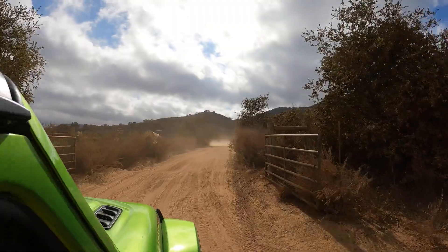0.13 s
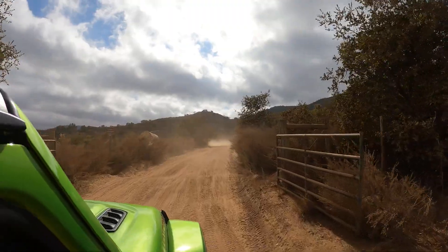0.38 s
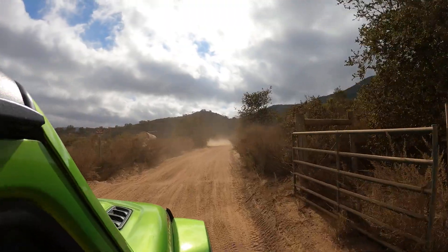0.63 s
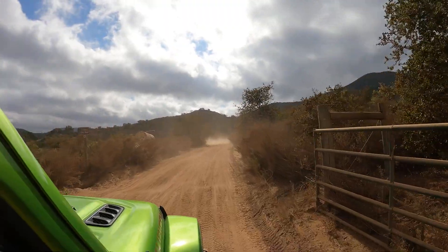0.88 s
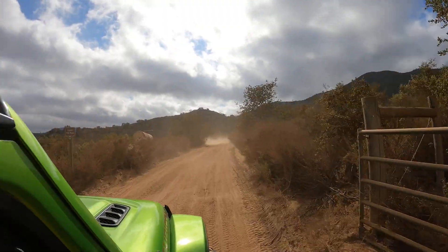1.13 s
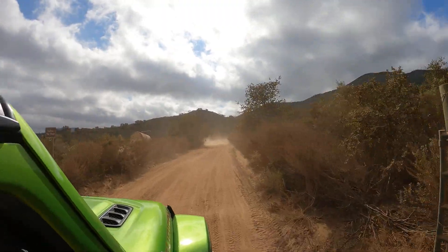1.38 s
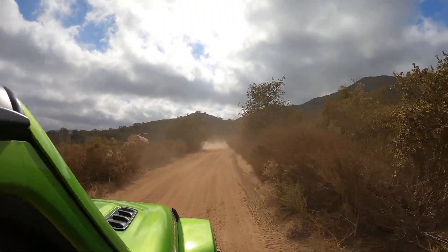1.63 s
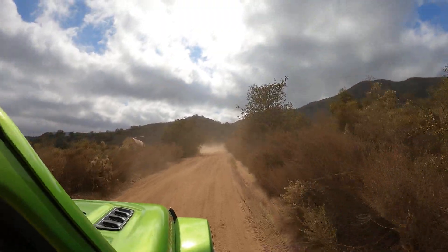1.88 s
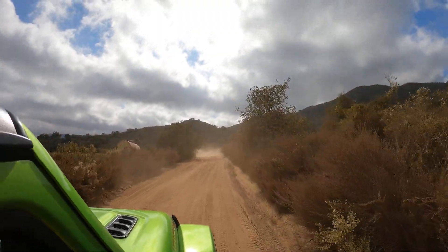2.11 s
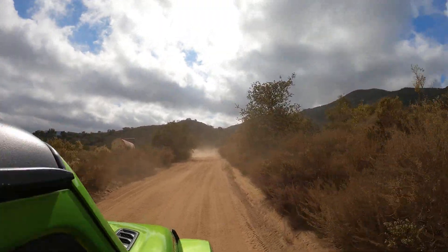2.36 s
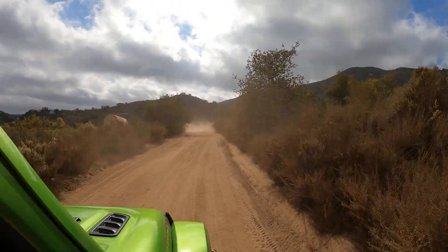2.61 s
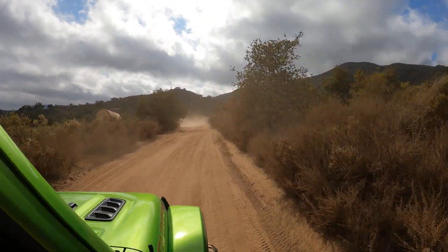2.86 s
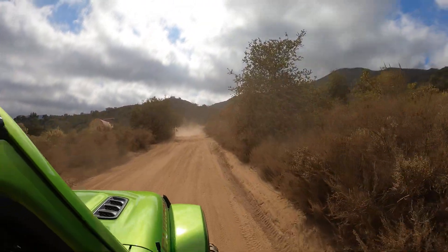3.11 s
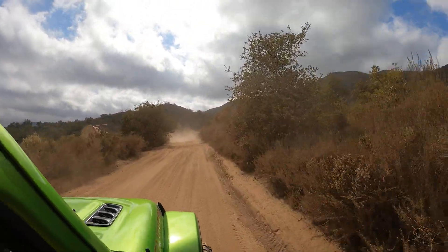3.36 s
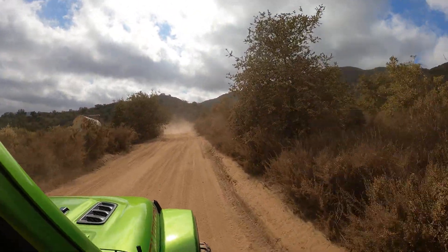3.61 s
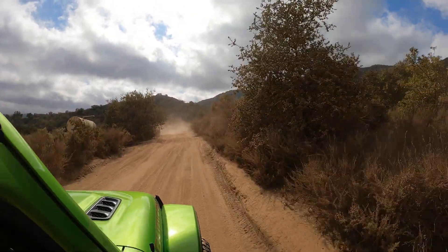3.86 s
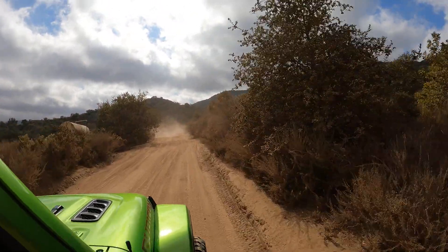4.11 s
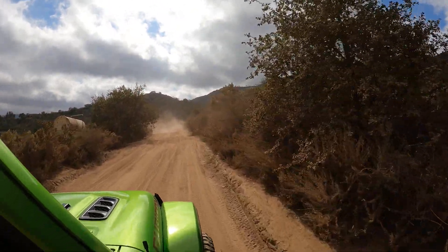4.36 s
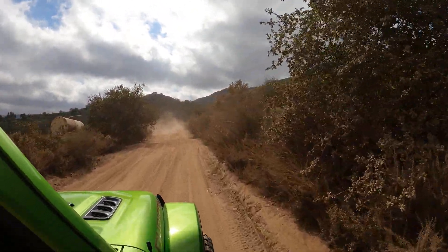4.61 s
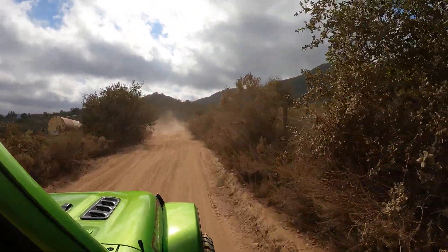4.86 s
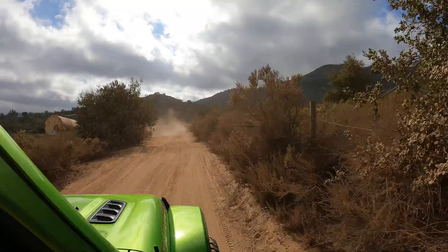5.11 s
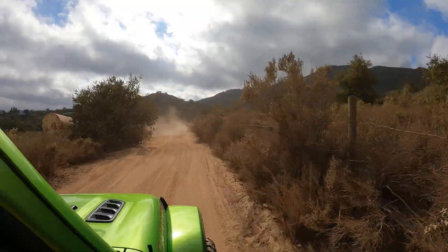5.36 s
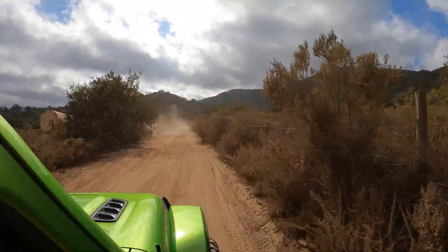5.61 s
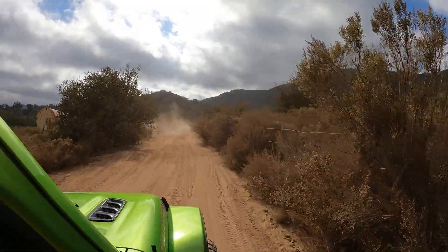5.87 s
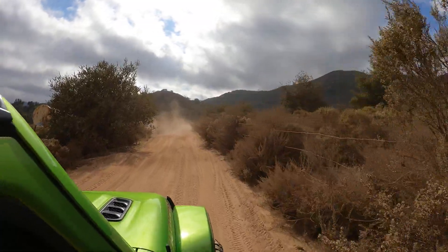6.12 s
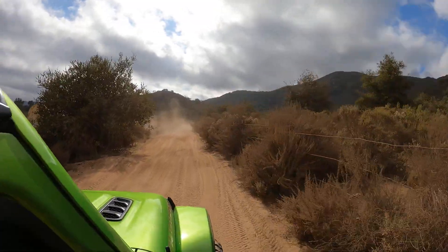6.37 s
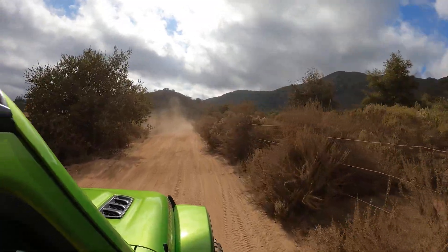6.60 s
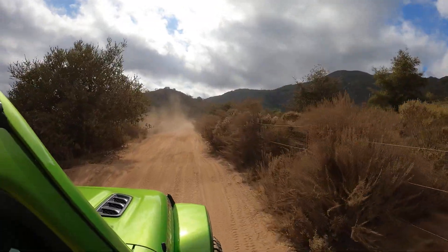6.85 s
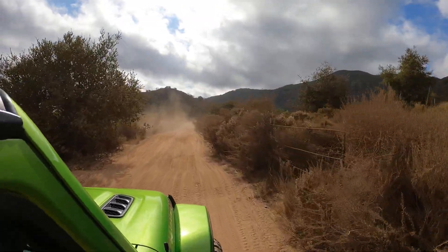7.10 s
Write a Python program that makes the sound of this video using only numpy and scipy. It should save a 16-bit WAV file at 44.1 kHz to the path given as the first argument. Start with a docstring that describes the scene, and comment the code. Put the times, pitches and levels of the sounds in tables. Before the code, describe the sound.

Heavy, ragged wind noise thumps and crackles over an off-road vehicle rolling along sandy ground, its low engine drone and tyre roar mostly buried.

```python
"""Wind buffets the microphone port first of all: a deep rumble, a throb, a flutter and short sharp gusts.
Place: the door of an off-road car rolling along a sandy track; one microphone, with the wind right on its port.
Tyre hiss and a low drone come back off the bushes and swell where they stand close; the exhaust hums and
gears whine faintly. Wind, tyres and drone are shaped noise, snaps are pulses, exhaust and gears are sines.
A fast, soft limiter holds the peaks down."""
import sys
import numpy as np
from scipy import signal
from scipy.fft import rfft, irfft, next_fast_len
from scipy.io import wavfile
from scipy.ndimage import uniform_filter1d, minimum_filter1d, map_coordinates

SR = 44100
rng = np.random.default_rng(int(sys.argv[2]) if len(sys.argv) > 2 else 0)


def to_linear_factor(level_db):
    """Convert decibel levels (scalar or array-like) to linear amplitude factors."""
    exponent = np.asarray(level_db, float) / 20
    return 10 ** exponent


def store_pcm(level_fs):
    """Save levels as 16-bit WAV."""
    pcm = np.round(np.clip(level_fs, -1, 1) * 32767).astype(np.int16)
    wavfile.write(sys.argv[1], SR, np.atleast_2d(pcm).T)


N = 318843  # samples

# air streaming over the port: [t/s, common strength/dB, tilt from large to small eddies/dB]
WIND_STREAM = [(0, -21, 2), (.15, -19, 0), (.4, -19, 0), (.75, -19, 0), (1, -20.5, 0), (1.5, -19.5, 0),
               (1.9, -19, 0), (2.3, -20, 0), (2.7, -20, 0), (2.85, -18, 0), (3.2, -21, 0), (3.4, -21.5, 0),
               (3.7, -20, 0), (4.05, -18, 0), (4.12, -24, 0), (4.45, -22, 0), (4.7, -20, 0), (5.1, -19, 0),
               (5.7, -18, 0), (6.15, -21, 0), (6.6, -18, 0), (6.95, -20, 0), (7.1, -19, 0), (7.23, -22, 0)]
# lulls, the stream briefly lifts off the port: [middle t/s, length scale/s, depth/dB]
WIND_LULLS = [(0.32, 0.044, 8.5), (0.567, 0.021, 6), (0.854, 0.037, 6), (1.218, 0.024, 10.5),
              (1.377, 0.056, 6), (1.54, 0.13, 5), (2.024, 0.04, 3.5), (2.252, 0.041, 7), (2.606, 0.016, 9),
              (2.953, 0.098, 10.5), (3.177, 0.098, 5), (3.624, 0.022, 0), (3.976, 0.052, 9),
              (4.19, 0.021, 5.5), (4.575, 0.033, 10.5), (4.83, 0.025, 11), (5.246, 0.021, 12.5),
              (5.396, 0.022, 6), (5.484, 0.018, 5), (5.953, 0.023, 20), (6.024, 0.028, 10.5),
              (6.217, 0.033, 6.5), (6.353, 0.017, 12), (6.705, 0.052, 5), (6.951, 0.021, 10),
              (7.035, 0.033, 5.5), (7.168, 0.041, 10), (2.393, 0.031, 6), (3.03, .025, 3), (3.352, .04, 4),
              (4.028, 0.024, 10.5), (4.102, 0.033, 9.5), (4.636, .025, 9), (4.725, .025, 7),
              (5.042, .025, 6), (5.139, .015, 6), (6.156, 0.023, 6.5), (6.405, .035, 1), (6.605, .03, 1.5),
              (6.823, .05, 5), (6.886, .02, 3)]
# heaves, large eddies rolling over the port: [middle t/s, rise or, if negative, dip/dB]
WIND_HEAVES = [(.12, 3), (.27, 5), (.5, 2.5), (.65, 3.5), (.92, 5), (1.43, 4), (1.52, 11), (1.75, 3.5),
               (1.849, 1), (2.16, 0), (2.28, 5), (2.48, -3), (2.82, -4), (3.01, 7), (3.3, 5.5), (3.54, 6),
               (3.65, 12), (3.92, 9), (4.06, 7), (4.67, 6.5), (4.79, 4), (5.19, 1.5), (5.35, 1), (5.5, 0),
               (5.6, 8), (5.98, 3.5), (6.06, 7), (6.28, 7), (6.63, 4), (6.78, 5), (6.89, 7)]
# gusts, eddies bursting on the port: [t just before the peak/s, reference level/dB, length scale/s]
GUST_BURSTS = [(0.035, -16, 0.027), (0.127, -10.5, 0.02), (0.221, -15, 0.024), (0.394, -18.5, 0.019),
               (0.503, -19, 0.032), (0.622, -14.5, 0.024), (0.681, -9, 0.019), (0.743, -16.5, 0.015),
               (0.777, -9.5, 0.015), (0.931, -18, 0.026), (1.184, -20, 0.021), (1.295, -17.5, 0.017),
               (1.622, -16, 0.0093), (1.829, -14, 0.01), (1.922, -23, 0.028), (1.981, -16, 0.022),
               (2.1, -10, 0.014), (2.129, -15.5, 0.025), (2.265, -15, 0.04), (2.328, -16, 0.017),
               (2.46, -11.5, 0.017), (2.816, -13, 0.025), (3.061, -14, 0.019), (3.097, -12.5, 0.014),
               (3.296, -18, 0.017), (3.485, -11, 0.033), (3.676, -11.5, 0.028), (3.741, -11.5, 0.019),
               (3.771, -10, 0.03), (3.803, -14, 0.015), (3.905, -12, 0.026), (3.989, -16.5, 0.022),
               (4.036, -18, 0.028), (4.5, -8, 0.016), (4.576, -12.5, 0.018), (4.612, -15, 0.017),
               (5.088, -14.5, 0.02), (5.157, -18, 0.018), (5.212, -14.5, 0.017), (5.295, -14, 0.022),
               (5.316, -17.5, 0.031), (5.414, -10.5, 0.028), (5.551, -15, 0.024), (5.592, -11, 0.021),
               (5.643, -14, 0.03), (5.715, -9.5, 0.017), (5.802, -14, 0.029), (5.878, -9.5, 0.021),
               (5.962, -16, 0.036), (6.048, -14.5, 0.018), (6.163, -17.5, 0.017), (6.242, -17, 0.02),
               (6.285, -14, 0.027), (6.373, -14.5, 0.011), (6.476, -14, 0.011), (6.536, -12.5, 0.015),
               (6.727, -7, 0.026), (6.911, -13.5, 0.021), (6.976, -16, 0.018), (7.06, -20.5, 0.022),
               (7.11, -23, 0.022), (0.448, -16, 0.019), (1.321, -22.5, 0.023), (1.785, -19.5, .018),
               (2.655, -20.5, .018), (2.857, -18.5, 0.014), (2.994, -23.5, 0.013), (3.45, -15, 0.016),
               (4.314, -22, 0.021), (4.665, -23, 0.027), (4.741, -21, 0.018), (4.906, -22, .018),
               (4.99, -23, .018), (5.501, -18.5, .018), (6.573, -18.5, 0.012), (6.76, -15, 0.015),
               (7.2, -19.5, 0.024)]
# smallest eddies breaking on the port edge: [t/s, reference level/dB, width scale/ms]
EDGE_SNAPS = [(0.4056, -18, 0.145), (0.5241, -22, 0.32), (0.63, -21, 0.34), (0.6804, -21.5, 0.24),
              (0.6855, -15.5, 0.21), (0.7183, -14.0, 0.32), (0.7222, -14.0, 0.22), (0.7547, -18.0, 0.33),
              (0.7721, -13.0, 0.32), (0.7777, -14.5, 0.19), (2.27, -20.0, 0.19), (2.2808, -17.0, 0.16),
              (2.3026, -20.5, 0.16), (2.5935, -20.5, 0.19), (2.738, -19.0, 0.17), (2.8268, -16, 0.24),
              (2.863, -20.0, 0.16), (3.0611, -17.0, 0.22), (3.0996, -16.0, 0.29), (3.1033, -17.0, 0.24),
              (3.4906, -13.5, 0.29), (3.651, -17.0, 0.2), (3.663, -18.0, 0.2), (3.6831, -14.5, 0.26),
              (3.6869, -12.0, 0.27), (3.7042, -13.0, 0.16), (3.7093, -15.0, 0.23), (3.7476, -13.5, 0.3),
              (3.7681, -10.5, 0.29), (3.811, -14.5, 0.24), (3.9177, -14.0, 0.3), (3.9262, -13.0, 0.27),
              (4.2359, -19.5, 0.21), (4.5019, -18, 0.24), (4.5066, -13.5, 0.27), (4.5103, -17.0, 0.22),
              (4.5145, -15.5, 0.27), (4.5186, -13.0, 0.26), (4.5798, -11, 0.16), (4.5865, -18.0, 0.16),
              (4.5903, -12, 0.15), (4.6221, -16.0, 0.16), (5.1086, -17.5, 0.19), (5.1137, -20.0, 0.19),
              (5.1497, -19.5, 0.16), (5.154, -16.0, 0.27), (5.1585, -14, 0.25), (5.1612, -12, 0.14),
              (5.2931, -12, 0.24), (5.3017, -19.5, 0.16), (5.309, -15.5, 0.22), (5.3186, -17.5, 0.26),
              (5.3223, -13.5, 0.22), (5.3282, -17.0, 0.29), (5.3673, -23, 0.3), (5.4145, -19.0, 0.16),
              (5.4188, -14.0, 0.3), (5.5519, -14, 0.27), (5.5555, -12.0, 0.29), (5.5626, -18.0, 0.16),
              (5.5662, -21.0, 0.17), (5.5719, -12.5, 0.32), (5.5951, -14, 0.19), (5.6098, -17.0, 0.27),
              (5.6416, -16, 0.18), (5.6499, -20.5, 0.24), (5.6663, -20, 0.3), (5.7037, -22.5, 0.16),
              (5.7173, -8.0, 0.29), (5.8042, -19.0, 0.27), (5.8077, -22.5, 0.19), (5.8131, -22.5, 0.27),
              (5.854, -24.5, 0.16), (5.8776, -22.5, 0.24), (5.8824, -12.5, 0.27), (5.8893, -22.0, 0.16),
              (6.0505, -26.0, 0.16), (6.0585, -25.5, 0.16), (6.2865, -25, 0.28), (6.2947, -20.0, 0.32),
              (6.4665, -28.5, 0.18), (6.4819, -21.0, 0.21), (6.5314, -21.0, 0.27), (6.542, -19, 0.17),
              (6.5485, -24.0, 0.16), (6.5526, -29.0, 0.16), (6.5598, -27.0, 0.24), (6.7107, -27.0, 0.24),
              (6.7308, -26.0, 0.27), (6.7386, -14.5, 0.28), (6.7449, -20.5, 0.29), (6.8551, -27, 0.28),
              (6.9093, -21.5, 0.27), (6.9173, -26.5, 0.26), (6.9237, -25.5, 0.18), (6.9285, -16.5, 0.26),
              (6.9843, -17, 0.17), (6.9907, -20.0, 0.19), (6.9951, -27.5, 0.16), (7.096, -20.5, 0.27)]
# the stream tears raggedly at the port edge: [middle t/s, length scale/s, level/dB]
EDGE_FLURRIES = [(0.01, 0.044, -25.5), (0.134, .08, -33.5), (3.678, 0.049, -31.5), (3.77, 0.11, -29.5),
                 (3.914, 0.06, -30), (4.608, 0.09, -40), (5.154, 0.031, -41), (5.32, 0.083, -34.5),
                 (5.57, 0.051, -31), (5.655, 0.048, -35), (5.73, 0.03, -34.5), (6.536, 0.038, -38),
                 (6.987, 0.02, -37)]
# the car as the roadside throws it back: [t/s, nearness of bushes/dB, drone level/dB, tyre grip/dB]
ROADSIDE = [(0.05, -43.5, 7.5, -10), (0.07, -46, -4.5, 0), (0.6, -50, 7, 1.5), (0.72, -47.5, -6, 0),
            (0.84, -49.5, 1, 1), (0.9, -48, 0.5, 0), (1.3, -46, 1.5, 0), (1.5, -45.5, 1, 2),
            (1.7, -44.5, 0, 1), (1.72, -46, 0, 1.5), (2.05, -47.5, 5.5, 3.5), (2.31, -47, 1.5, 1),
            (2.45, -49.5, 2, 3.5), (2.81, -46.5, 3.5, 3), (3.05, -44.5, 0.5, 1.5), (3.2, -45, 7, 3.5),
            (3.35, -45, -6, 4), (3.5, -44.5, 5, 3), (3.68, -43, 5.5, 2), (3.9, -44, 3, -1.5),
            (3.96, -46, 4.5, 3), (4.26, -47.5, 7.5, 3), (4.48, -43, 7, 0), (4.74, -47, 4, 3),
            (5.09, -43.5, 1, 0), (5.89, -51.5, 5, 2.5), (6.05, -48.5, -16, -2), (6.12, -53.5, 3, 3),
            (6.28, -51, -7, -2), (6.64, -52.5, 4, 0.5), (7.18, -53, 0, 1.5)]
# the engine slows, holds, climbs as a lower gear engages, falls away: [t/s, cycle rate f/Hz, load/dB]
ENGINE_RUN = [(0, 51.4, -38), (.16, 51.2, -43), (.28, 51, -47), (.4, 47.5, -54), (.58, 42.8, -56),
              (.7, 37, -58), (1, 33.4, -54), (2.15, 30.9, -48), (2.85, 32.8, -47), (3.2, 33.3, -44),
              (3.45, 33.2, -40), (3.6, 35, -46), (3.75, 43, -43), (3.95, 46.4, -42), (4.1, 47.6, -44.5),
              (4.45, 46.3, -46), (4.65, 45, -50), (5.05, 41, -55), (5.3, 39, -70), (7.23, 36, -80)]
# relative level/dB of the 4th to 19th multiples of the cycle rate
EXHAUST_HARMONICS = [-5, -2, -8, -7, -4, -2, -8, -8, -7, -8, -9, -4, -7, -10, -9, -9]
# response of the exhaust pipe: [f/Hz, gain/dB]
EXHAUST_PIPE = [(100, 0), (570, 0), (660, -5), (800, -12), (1100, -25)]
# faint gear tones: [start t/s, length/s, f at start/Hz, glide/(Hz/s), reference level/dB]
GEAR_WHINES = [(-.1, 0.33, 1445, -26, -50), (0.43, 0.52, 1488, 5.5, -49), (0.804, 0.56, 1466, 19.5, -48),
               (1.304, 0.33, 1480, -61, -48), (3.724, 0.36, 1430, 190, -43.5),
               (3.862, 0.2, 1475, -170, -46), (3.748, 0.28, 1594, -20.5, -48),
               (4.621, 0.32, 1483, -48, -48), (2.444, 0.35, 1380, 1, -50), (3.001, 0.26, 1556, 200, -45),
               (3.418, 0.33, 1580, -60.5, -48)]
# noise colours, from large eddies to tyre hiss: [f/Hz, relative spectral level/dB]
RUMBLE_COLOUR = [(8, -31.5), (20, 0.5), (30, -4), (50, -5), (75, -10.5), (140, -60.5)]
THROB_COLOUR = [(35, -31.5), (55, -0.5), (80, -2), (120, -2), (160, -12), (300, -37.5)]
FLUTTER_COLOUR = [(80, -48), (140, -2.5), (220, -2), (350, -16), (600, -30), (1200, -71)]
GUST_COLOUR = [(60, -19), (130, -3.5), (200, 3), (330, -6), (550, -22), (1200, -51)]
EDGE_COLOUR = [(200, -31.5), (380, -0.5), (650, -12), (1000, -15.5), (1500, -18.5), (2500, -37)]
DRONE_COLOUR = [(200, -36.5), (300, -3.5), (420, -7.5), (510, -3), (620, -7), (800, -23), (1200, -41)]
ROAR_COLOUR = [(400, -43.5), (700, -2), (1000, -2), (1250, -3.5), (1500, -1), (1800, -5.5), (2300, -10),
               (3200, -25), (5000, -59)]
GRAVEL_COLOUR = [(900, -31.5), (1400, -4), (2000, 0), (2800, -7), (4000, -12), (6000, -37.5)]
HISS_COLOUR = [(1300, -35), (2200, -2.5), (2800, -4.5), (3600, -7.5), (4200, -9), (5000, -14),
               (6300, -20.5), (8000, -24.5), (9000, -31.5), (10500, -40), (12000, -47.5), (13500, -66.5),
               (15500, -70.5)]


def wind():
    """One strength drives all eddies: large ones rumble, smaller ones throb and flutter in partly shared lumps."""
    rumble_db, throb_db, flutter_db = -2.5, -4, -17  # each eddy size over the strength
    heave_s = 0.044  # length scale
    t = np.arange(N) / SR
    strength_db, tilt_db = curves(WIND_STREAM)
    strength_db = strength_db - sum(depth * bell(t, s, length) for s, length, depth in WIND_LULLS)
    heave_db = sum(rise * bell(t, s, heave_s) for s, rise in WIND_HEAVES)
    lumps = wobble(14)

    rumble_lumps = to_linear_factor(1.4 * wobble(9.1) + 0.7 * lumps)
    rumble = unit(rumble_lumps * even(rush(RUMBLE_COLOUR), 0.034))
    rumble = rumble * to_linear_factor(strength_db + rumble_db + heave_db - tilt_db / 2)

    # each gust also shoves the throb
    gust_s, gust_db, _ = np.transpose(GUST_BURSTS)
    shove = bells(gust_s, gust_db - 5.5, 0.026, peak_at=0.48)
    throb_lumps_db = 1.22 * lumps + 1.7 * wobble(7) + 1.5 * wobble(26)
    steady = to_linear_factor(strength_db + throb_db + tilt_db / 2 + throb_lumps_db)
    throb = np.hypot(steady, shove) * even(rush(THROB_COLOUR, patchy_db=3), 0.053)

    # the small eddies swing wider than the strength
    flutter_lumps = to_linear_factor(1.3 * lumps + 1.9 * wobble(30))
    flutter = unit(flutter_lumps * rush(FLUTTER_COLOUR))
    flutter = flutter * to_linear_factor(widen(strength_db, 2.64) + flutter_db + tilt_db)
    return rumble + throb + flutter


def gusts():
    """Passing eddies thud, the smallest ones snap, and ragged noise surrounds each snap and fills the flurries."""
    s, db, length = np.transpose(GUST_BURSTS)
    thuds = bells(s, db - 8.5, length, peak_at=0.43) * even(rush(GUST_COLOUR), 0.025)
    s, db, _ = np.transpose(EDGE_SNAPS)
    around_snaps = bells(s, db - 17, 0.0094, peak_at=0.083)
    middle, span, tear_db = np.transpose(EDGE_FLURRIES)
    flurries = bells(middle, tear_db, span, peak_at=0)
    edges = np.hypot(around_snaps, flurries) * unit(to_linear_factor(4.0 * wobble(150)) * rush(EDGE_COLOUR))
    return thuds + edges + snaps()


def snaps():
    """Each snap is a narrow spike of pressure, up or down, that swings back on either side."""
    s, db, width_ms = np.transpose(EDGE_SNAPS)[:, :, None]
    at = np.round(s * SR).astype(int) + np.arange(-300, 300)
    u = (at / SR - s) / (width_ms / 1000)  # time in widths
    shape = np.exp(-(u / 2.1) ** 2 / 2) * np.cos(0.86 * u)
    sign = np.sign(rng.standard_normal(s.shape))
    spikes = sign * to_linear_factor(db - 3.5) * shape
    return np.bincount(at.ravel(), spikes.ravel(), minlength=N)[:N]


def car():
    """Four noises swell as bushes pass close; a separate level also shapes the low drone, tyre grip the roar."""
    near_db, drone_level_db, grip_db = curves(ROADSIDE)
    twigs = wobble(8.1)
    drone_db = near_db + 2.5 + drone_level_db + 0.44 * wobble(10)
    drone = to_linear_factor(drone_db) * rush(DRONE_COLOUR, patchy_db=-0.5)
    roar_db = near_db + 4.5 + grip_db + 0.58 * twigs
    roar = to_linear_factor(roar_db) * rush(ROAR_COLOUR, patchy_db=1.1)
    # the gravel wash swings wider than the nearness
    gravel = unit(to_linear_factor(1.7 * wobble(60)) * rush(GRAVEL_COLOUR, patchy_db=0.7))
    gravel = gravel * to_linear_factor(widen(near_db, 1.8) - 5.5)
    hiss = to_linear_factor(near_db + 0.09 * twigs) * rush(HISS_COLOUR, patchy_db=0.86)
    return drone + roar + gravel + hiss


def engine():
    """Repeating firings make the exhaust a comb of multiples, each fluttering on its way to the port."""
    hz, load_db = curves(ENGINE_RUN)
    turn = 2 * np.pi * np.cumsum(hz * (1 + 0.0025 * wobble(8))) / SR  # phase of the engine cycle
    pipe_hz, pipe_db = np.transpose(EXHAUST_PIPE)
    comb = np.zeros(N)
    for k, db in enumerate(EXHAUST_HARMONICS, start=4):
        level_db = db + np.interp(k * hz, pipe_hz, pipe_db) + 3.5 * wobble(14)
        phase = k * turn + rng.uniform(0, 2 * np.pi) + 0.75 * wobble(26)
        comb += to_linear_factor(level_db) * np.sin(phase)
    return np.sqrt(2) * to_linear_factor(load_db) * comb


def whines():
    """Gear tones are sines that swell and fade, wavering in pitch and strength as the load changes over bumps."""
    t, out = np.arange(N) / SR, np.zeros(N)
    for start, length, hz, glide, db in GEAR_WHINES:
        swell = np.sin(np.pi * np.clip((t - start) / length, 0, 1)) ** 0.55
        pitch = (hz + glide * (t - start)) * (1 + 0.011 * wobble(30))
        phase = 2 * np.pi * np.cumsum(pitch) / SR
        out += np.sqrt(2) * swell * to_linear_factor(db + 4 * wobble(30) - 1) * np.sin(phase)
    return out


def unit(x):
    """Scale to rms 1."""
    return x / np.sqrt(np.mean(x ** 2) + 1e-20)


def curves(rows):
    """One value per sample for each column after the time."""
    s, *cols = np.transpose(rows)
    return [np.interp(np.arange(N) / SR, s, c) for c in cols]


def widen(level_db, factor):
    """Stretch the swings of a level about its mean."""
    return level_db.mean() + factor * (level_db - level_db.mean())


def wobble(rate):
    """A smooth random curve, rate knots a second."""
    return map_coordinates(rng.standard_normal(N // 100), [np.arange(N) * rate / SR])


def rush(spectrum, patchy_db=0):
    """Noise of rms 1 in the given colour, with patches of random gain in time and frequency."""
    z = signal.stft(rng.standard_normal(N + SR), nperseg=512)[2]
    field = uniform_filter1d(rng.standard_normal(z.shape), size=6, axis=0)
    field = uniform_filter1d(field, size=12, axis=1)
    x = signal.istft(z * to_linear_factor(patchy_db * unit(field)), nperseg=512)[1]
    f, db = np.transpose(spectrum)
    m = next_fast_len(len(x))
    # straight lines over log frequency, next to nothing outside the table
    log_f = np.log(np.fft.rfftfreq(m, 1 / SR) + 1)
    colour_db = np.interp(log_f, np.log(f + 1), db, left=-120, right=-120)
    return unit(irfft(rfft(x, m) * to_linear_factor(colour_db), m)[:N])


def even(x, seconds):
    """Reduce the chance swells of a noise that are slower than the given span."""
    span = round(seconds * SR)
    power = uniform_filter1d(uniform_filter1d(x ** 2, size=span), size=span)
    return unit(x / np.sqrt(np.abs(power) + 0.15))


def bell(t, middle, length):
    """A smooth rise and fall, 1 in the middle and close to 0 one length away."""
    return np.exp(-5 * ((t - middle) / length) ** 2)


def bells(times, level_db, lengths, peak_at):
    """Envelope of bell-shaped bursts added in power, each peaking peak_at lengths after its time."""
    t, power = np.arange(N) / SR, np.zeros(N)
    for s, db, length in np.broadcast(times, level_db, lengths):
        near = slice(max(round((s - 4 * length) * SR), 0), round((s + 5 * length) * SR))
        power[near] += to_linear_factor(db) ** 2 * bell(t[near], s + peak_at * length, length)
    return np.sqrt(power)


def scene():
    """Wind on the port, car and roadside all add up at one microphone."""
    return (wind() + gusts() + car() + engine() + whines())[None]


def band_limit(x):
    """A steep low-pass at the top of the band."""
    return signal.sosfilt(signal.butter(12, 15650, fs=SR, output="sos"), x)


def record(dry):
    """A fast, soft limiter holds the wind peaks down, easing in just ahead of each peak."""
    need = np.minimum(1, 0.33 / (np.abs(dry) + 1e-9)) ** 0.6  # acts above 0.33 of full scale
    held = minimum_filter1d(need, size=440, axis=1)  # 10 ms
    gain = uniform_filter1d(held, size=440, axis=1)
    return band_limit(dry * gain)


dry = scene()
out = record(dry)
store_pcm(out)
```